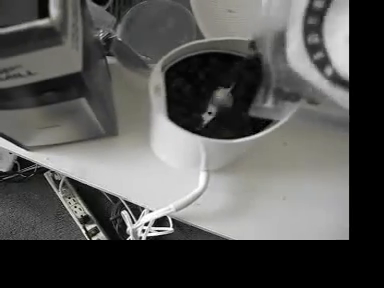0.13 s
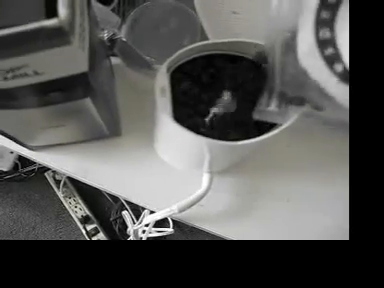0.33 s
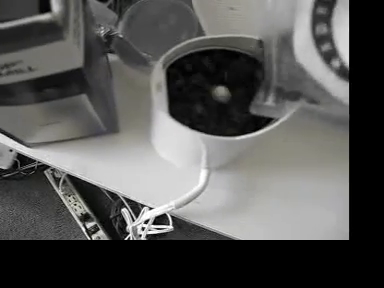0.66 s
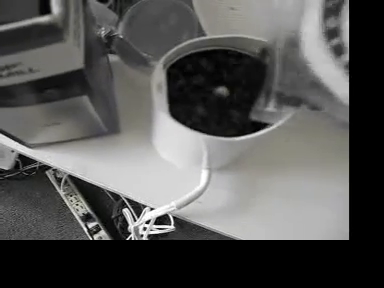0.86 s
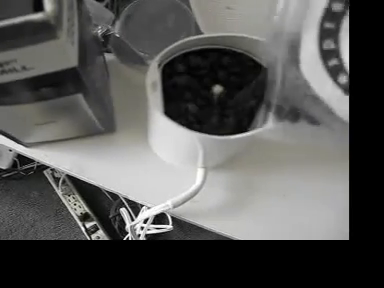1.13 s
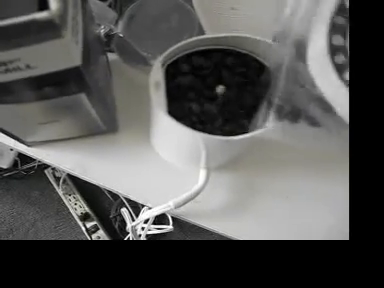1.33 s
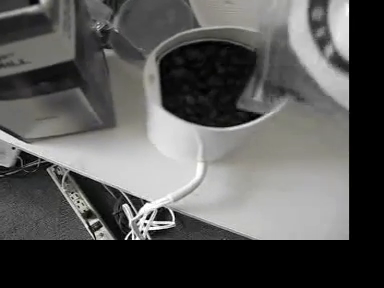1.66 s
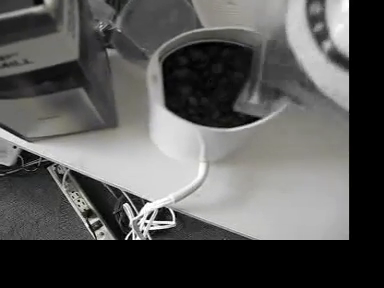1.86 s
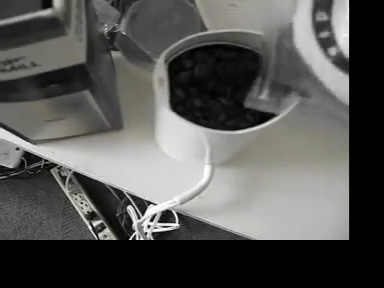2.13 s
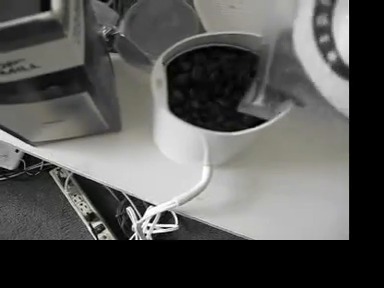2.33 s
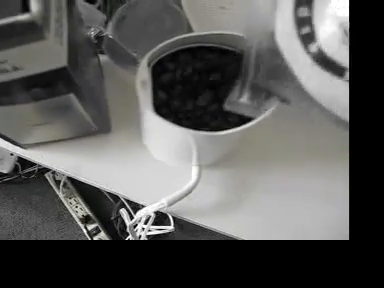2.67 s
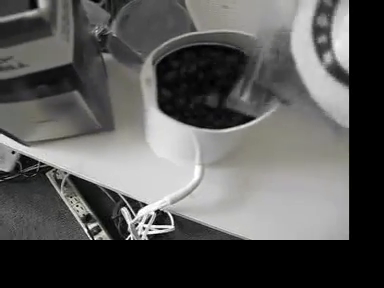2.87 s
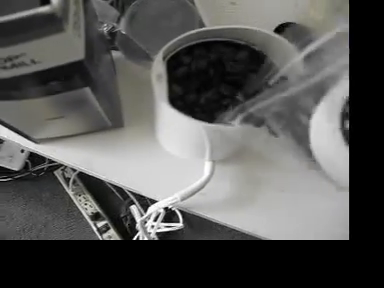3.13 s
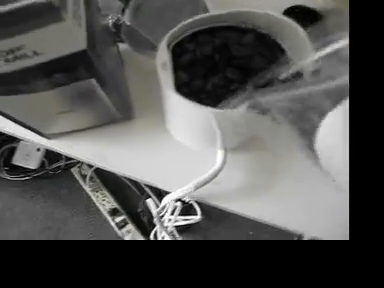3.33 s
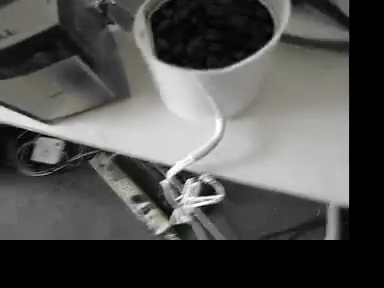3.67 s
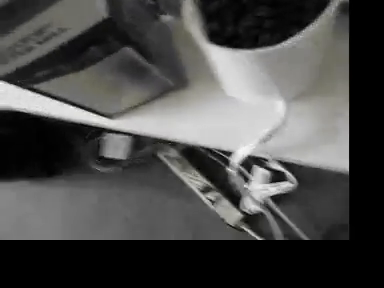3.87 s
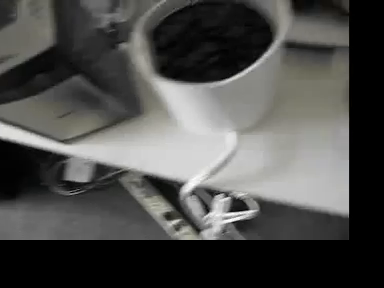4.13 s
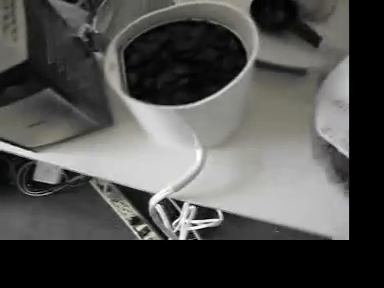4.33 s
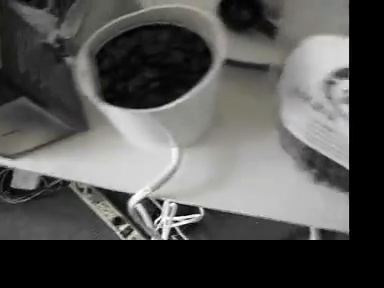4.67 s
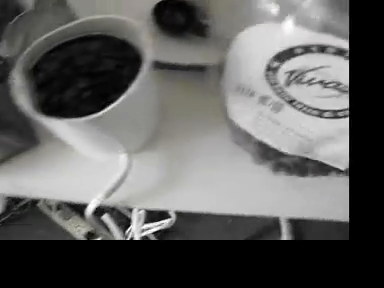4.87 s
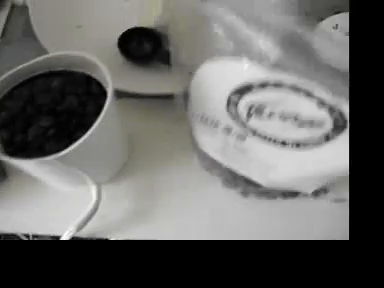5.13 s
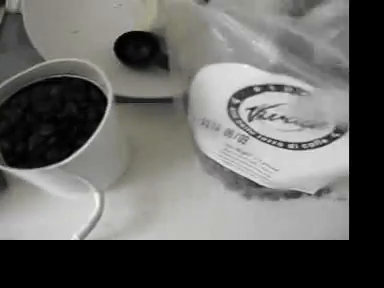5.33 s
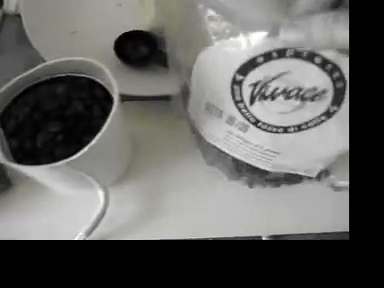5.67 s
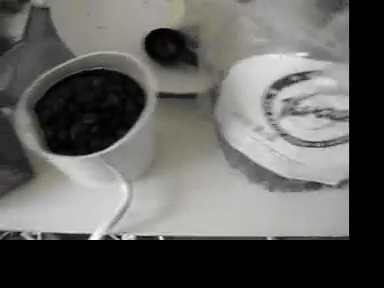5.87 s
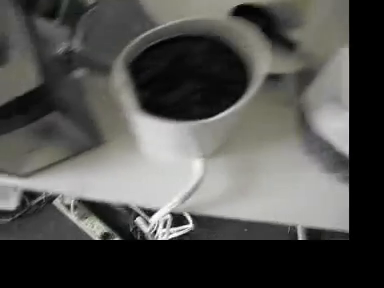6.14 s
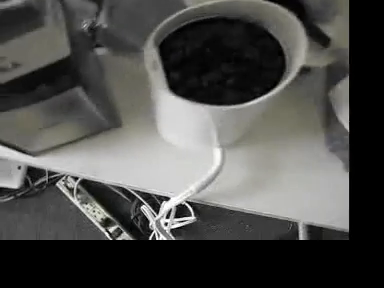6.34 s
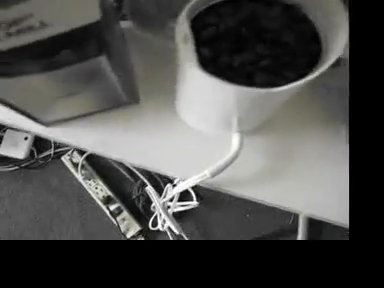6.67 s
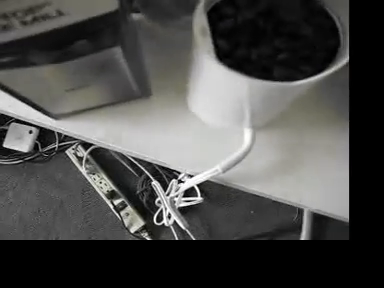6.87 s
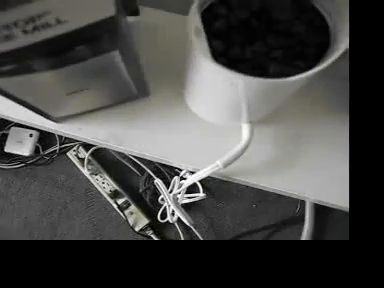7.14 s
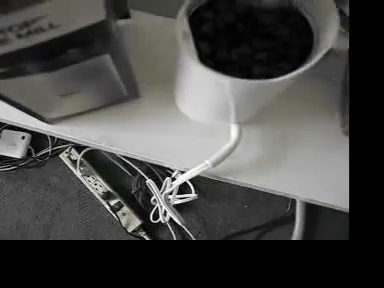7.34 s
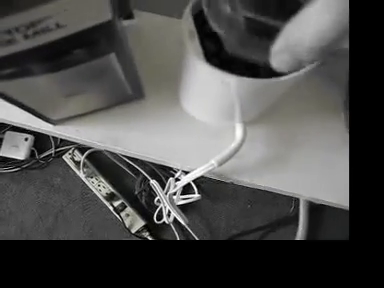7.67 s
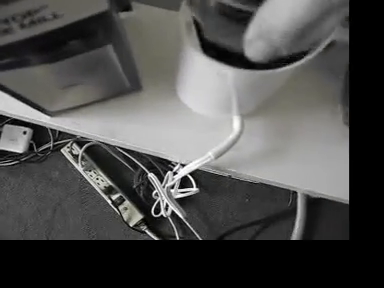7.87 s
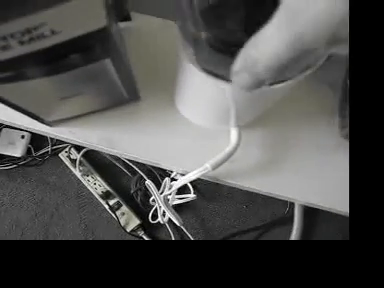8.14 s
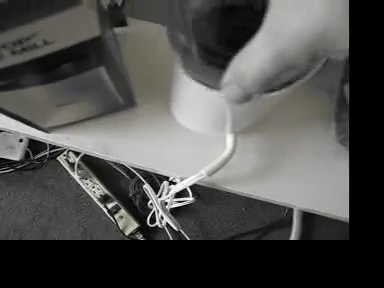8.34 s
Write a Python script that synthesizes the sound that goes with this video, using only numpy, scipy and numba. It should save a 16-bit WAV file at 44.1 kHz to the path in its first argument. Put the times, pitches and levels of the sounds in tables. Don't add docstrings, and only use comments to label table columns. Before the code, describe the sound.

Dense, high bean ticks and light film crackle open the scene, with a slight metallic ring that fades as the cup fills. Around the middle the plastic bag is squeezed hard in sharp, loud bursts, then pops only occasionally. A quiet gap holds steady microphone hiss and tiny squeaks. Last, a lid taps, slides and clunks over the cup. Very close microphone, dry small room, no motor.

```python
import sys
import numpy as np
from scipy import signal
from scipy.fft import rfft, irfft
from scipy.io import wavfile
from scipy.ndimage import uniform_filter1d
from numba import njit

SR = 44100
rng = np.random.default_rng(int(sys.argv[2]) if len(sys.argv) > 2 else 0)


def generate_wav(sig):
    pcm = np.round(np.clip(np.atleast_2d(sig).T, -1, 1) * 32767).astype(np.int16)
    wavfile.write(sys.argv[1], SR, pcm)


def ratio_of_db(decibels):
    return 10 ** (np.asarray(decibels, float) / 20)


N = 374409
TIME = np.arange(N) / SR

# (time [s], hold [s], level [dB], crispness [dB])
SHAKES = [(0.033, 0.12, -37.5, 4.5), (0.26, 0.13, -36.5, 3.5), (0.444, 0.06, -38, 7),
          (0.582, 0.11, -35.5, 3.5), (0.78, 0.077, -39.5, 9.5), (0.893, 0.2, -36, 0.5),
          (1.092, 0.14, -41, 6), (1.299, 0.033, -39, 4.5), (1.432, 0.021, -34.5, -7), (1.62, 0.24, -33, -3),
          (1.764, 0.1, -43, 3.5), (2, 0.023, -39, 9), (2.104, 0.052, -39, 2), (2.305, 0.25, -38, -0.5),
          (2.58, 0.08, -38.5, 3), (2.71, 0.011, -44, 2)]
BEAN_CYCLES = 20


@njit
def rings(start, hz, t60, size, n):
    y = np.zeros(n)
    for k in range(len(start)):
        turn = np.exp(2j * np.pi * hz[k] / SR - np.log(1000) / (t60[k] * SR))
        z = size[k] + 0j
        for i in range(start[k], min(n, start[k] + int(t60[k] * SR))):
            y[i] += z.imag
            z *= turn
    return y


def grains(s, hz, t60, size):
    s, hz, t60, size = (np.ravel(v) * 1. for v in np.broadcast_arrays(s, hz, t60, size))
    start = np.clip(s * SR, 0, N - 1).astype(np.int64)
    return rings(start, np.clip(hz, 40, .42 * SR), np.abs(t60), size, N)


def tick(s, db, hz, cycles):
    slow_decay = grains(s, hz, cycles / hz, ratio_of_db(db + 8))
    fast_decay = grains(s, hz, cycles / 3 / hz, ratio_of_db(db + 8))
    return slow_decay - fast_decay


def bursts(s, db, hz, octaves, cycles, smear_s, count):
    chance = rng.random((len(s), 3, count))
    mode_hz = np.reshape(hz, (-1, 1)) * 2 ** (octaves * (2 * chance[:, 0] - 1))
    late = chance[:, 1] ** 2
    sign = np.sign(chance[:, 2] - .5)
    size = ratio_of_db(db[:, None] - 9 * late) * sign / np.sqrt(count / 3)
    return grains(s[:, None] + smear_s * late, mode_hz, cycles / mode_hz, size)


def gesture(s, hold_s, db, rise_db_s, fall_db_s):
    power = np.zeros(N)
    for start, hold, top_db in zip(s, hold_s, db):
        i = max(int((start - 50 / rise_db_s) * SR), 0)
        j = int((start + hold + 50 / fall_db_s) * SR)
        t = TIME[i:j] - start
        rise_db = rise_db_s * np.minimum(t, 0)
        fall_db = fall_db_s * np.maximum(t - hold, 0)
        power[i:j] += ratio_of_db(top_db + rise_db - fall_db) ** 2
    return np.sqrt(power)


def hiss():
    # (frequency [Hz], level [dB per Hz])
    density = [(15, -37), (25, -9), (172, -5.5), (238, -3.5), (313, -4.5), (496, -4), (809, -5.5),
               (4990, -15), (12600, -22.5), (16500, -43)]
    hz, db = np.transpose(density)
    f = np.arange(N // 2 + 1) * SR / N + 1
    shape = ratio_of_db(np.interp(np.log(f), np.log(hz), db))
    noise = irfft(rfft(rng.standard_normal(N)) * shape, N)
    return noise * ratio_of_db(-49) / np.sqrt(np.mean(noise ** 2))


def crackle(moves, hollow_db, upper_db, rise_db_s, fall_db_s, body_share, spread_db, own_db, per_s, taut=1):
    # (frequency [Hz], spread [octaves], decay [cycles])
    film_bands = [
        (2552, 0.95, 11),
        (680, 0.85, 10.5),
        (6000, 1.436, 27),
        (11500, 0.56, 4.8),
    ]
    # (time [s], frequency [Hz])
    crunch_pitch = [(0, 2830), (.7, 2530), (1.5, 2480), (3.5, 2070), (4.1, 2300), (4.95, 2750),
                    (5.03, 3600), (5.15, 2350), (5.4, 2780), (7, 1940)]
    patch_db = 2
    at, hold, db, crisp_db = np.transpose(moves)
    t0, t1 = max(at[0] - .2, 0), at[-1] + .6
    chance = rng.random((20000, 3 + 4 * len(film_bands)))[:int(per_s * (t1 - t0))].T
    s = t0 + chance[0] * (t1 - t0)
    crease_db = np.minimum(-spread_db * np.log(chance[1] + 1e-9), 4 * spread_db)

    flurry = rng.standard_normal(200)

    def swing(values):
        return np.interp((s - t0) / .03, np.arange(len(values)), values)

    crease_db = crease_db + 1.7 * swing(flurry)
    body = gesture(at, hold, db, body_share * rise_db_s, body_share * fall_db_s)
    crisp = gesture(at, hold, db + crisp_db, rise_db_s, fall_db_s)
    gains = [body, body * ratio_of_db(hollow_db), np.sqrt(body * crisp) * ratio_of_db(upper_db), crisp]
    stretch = [1, 1, 1, taut]
    span, out = slice(int(t0 * SR), int(t1 * SR)), np.zeros(N)
    for k, (hz, octaves, cycles) in enumerate(film_bands):
        a, b, c, d = chance[3 + 4 * k:7 + 4 * k]
        center = hz if k else np.interp(s, *np.transpose(crunch_pitch))
        f = center * stretch[k] * 2 ** (octaves * (a + b - 1))
        patch = patch_db * swing(np.roll(flurry, 37 * k + 37))
        size = ratio_of_db(crease_db + patch + own_db * (2 * c - 1)) * np.sign(d - .5)
        band = grains(s, f, cycles / f, size)
        out += band / np.std(band[span]) * gains[k]
    return out


def rustle():
    # (time [s], hold [s], level [dB], crispness [dB])
    squeezes = [
        (3.63, 0.049, -24.5, -3.5),
        (3.7, 0.058, -29, -4.5),
        (3.955, 0.014, -28.5, -3),
        (4.01, 0.072, -25, -5),
        (4.17, 0.019, -31, 4.5),
        (4.225, 0.052, -31, 1),
        (4.32, 0.059, -31.5, 1),
    ]
    # (time [s], hold [s], level [dB], crispness [dB])
    light_grips = [(2.87, 0.24, -42, -6.5), (3.02, 0.15, -43, -27), (3.25, 0.12, -38.5, -23),
                   (3.4, 0.029, -40.5, -23), (3.52, 0.018, -44.5, -3), (3.895, 0.0072, -34.5, -13),
                   (4.46, 0.0043, -43, -1), (4.483, 0.0074, -27.5, -7), (4.56, 0.051, -44.5, -7),
                   (4.755, 0.0063, -33.5, -26), (4.783, 0.008, -29.5, -21), (4.825, 0.023, -31.5, -15.5),
                   (4.89, 0.012, -33, -28), (5.012, 0.015, -34.5, -21), (5.028, 0.026, -38, -11),
                   (5.33, 0.004, -47, -3), (5.358, 0.021, -25, -16), (5.415, 0.012, -30, -14.5),
                   (5.5, 0.032, -45, -32), (5.61, 0.045, -47.5, -11), (5.66, 0.033, -45, -12),
                   (5.76, 0.0066, -44.5, -18), (6.82, 0.0066, -54, 7), (6.92, 0.018, -45, -7),
                   (6.985, 0.016, -39, 2.5), (7.01, 0.0022, -29.5, 0.5)]
    filling_db = -11.0 + 2 * TIME
    grip_hollow_db = np.where(TIME < 4.6, -1.5, -7.5)
    pouring = crackle(SHAKES, filling_db, -7.5, 154, 187, 0.6, spread_db=4.0, own_db=5.0, per_s=2000)
    crumpling = crackle(KEEP_SQUEEZES := squeezes, -6.0, -1.2, 334, 208, 0.86,
                        spread_db=-0.5, own_db=5.0, per_s=5000, taut=1.03)
    gripping = crackle(light_grips, grip_hollow_db, 0.1, 870, 272, 0.96,
                       spread_db=3.0, own_db=3.5, per_s=4000)
    return pouring + crumpling + gripping


def snaps():
    # (time [s], peak level [dB], frequency [Hz], treble against peak [dB])
    pour_folds = [(0.053, -12, 2820, -1), (0.4453, -8.5, 2298, -23), (0.6288, -12.5, 3290, -10),
                  (0.792, -17, 3030, -2), (1.1499, -17, 2040, 6.5), (1.293, -14.5, 2870, 2),
                  (1.328, -15, 2200, -11), (1.4496, -14, 2650, 3), (1.515, -10.5, 2170, -13.5),
                  (1.9354, -15.5, 2410, 5), (2.175, -15, 1870, -22), (2.8401, -10, 1870, -9),
                  (2.9114, -18, 1380, -28), (3.0038, -14.5, 2040, 6.5), (3.04, -13, 2700, -15),
                  (3.063, -19, 1890, -21), (3.0783, -3.5, 2520, -17), (3.244, -6, 3150, -14.5),
                  (3.2873, -7.5, 2120, -21), (3.2982, -2, 2400, -36), (3.4033, -9, 1850, -14),
                  (3.5162, -18.5, 3630, 0), (3.5709, -13.5, 1470, -22)]
    # (time [s], peak level [dB], frequency [Hz], treble against peak [dB])
    fist_folds = [(3.6258, -6.5, 2600, -15), (3.636, -17, 1700, -25), (3.639, -7.5, 1610, -20),
                  (3.658, -9, 2090, -10), (3.694, -13, 2000, -11), (3.703, -11, 1800, -15),
                  (3.715, -11, 1500, -25), (3.7704, -8.5, 1620, -25), (3.911, -9.5, 2010, -37),
                  (3.938, -2.5, 1800, -39), (3.9609, -2.5, 1900, -10), (3.9827, 1, 3120, -31),
                  (4.1041, 2.5, 2400, -3), (4.181, 0.5, 2830, -13), (4.186, -4.5, 2360, -25),
                  (4.1879, -4, 2940, -19), (4.31, -18, 2300, -26), (4.3267, -17, 2950, -22),
                  (4.4827, 1, 2310, -3.5), (4.748, -7.5, 2630, -9), (4.7814, -11.5, 2360, -36),
                  (4.786, -15, 2700, -25), (4.79, -11, 2200, -25), (4.8819, -4, 3470, -19),
                  (4.9882, -18, 1520, -30), (5.1295, -21.5, 1550, -10), (5.342, -8.5, 3020, -10),
                  (5.3547, -4, 2360, -12), (5.3706, -3.5, 1880, -4.5), (5.3879, -2, 2900, -9),
                  (5.445, -11, 2800, -17), (5.5103, -12.5, 2010, -32), (5.66, -21, 3050, -8),
                  (6.9025, -24.5, 3590, -0.5), (6.982, -28, 3010, 9), (7.0569, -18, 2970, 6)]
    # (time [s], peak level [dB], frequency [Hz])
    releases = [(3.6943, -13, 8400), (3.7222, -11, 12900), (3.762, -15, 13000), (3.7843, -13, 12800),
                (3.8046, -17, 12500), (3.8385, -18, 9300), (3.8606, -26, 13200), (4.0498, -13, 10200),
                (4.2291, -15, 12300), (4.2668, -11, 12000), (4.2988, -13, 13200), (4.3268, -8, 12900),
                (4.3423, -16, 13000), (4.3794, -13, 12300), (4.4047, -19, 12700), (4.4186, -26, 11100)]
    s, db, hz, treble_db = np.transpose(pour_folds + fist_folds)
    each = np.ones(len(s))
    contact = tick(s, db - 9.5, hz, 10.6)
    crack = bursts(s, db + 0.2, np.sqrt(3000 * hz), 0.75, cycles=7.7, smear_s=0.0065, count=30)
    upper = bursts(s, db + treble_db / 2 - 15.5, 4400 * each, 0.38, cycles=40.0, smear_s=0.002, count=16)
    treble = bursts(s, db + treble_db, 9000 * each, 0.89, cycles=19.0, smear_s=0.0065, count=30)
    s, db, hz = np.transpose(releases)
    return contact + crack + upper + treble + tick(s, db - 0.1, hz, BEAN_CYCLES)


def bean_ticks():
    # (time [s], peak level [dB], frequency [Hz])
    bean_hits = [(0.0072, -18, 11900), (0.0194, -21, 10000), (0.0285, -17, 8600), (0.0516, -7, 12600),
                 (0.0632, -14, 6400), (0.072, -12, 8400), (0.0814, -5, 11000), (0.088, -17, 8200),
                 (0.095, -13, 11900), (0.099, -6, 10800), (0.13, -13, 11000), (0.1382, -8, 11600),
                 (0.1508, -10, 11700), (0.158, -15, 12100), (0.1656, -8, 11800), (0.17, -19, 11900),
                 (0.1774, -9, 11400), (0.1837, -10, 10700), (0.19, -11, 10800), (0.1967, -12.5, 9800),
                 (0.2254, -17, 7350), (0.234, -9, 11600), (0.2405, -22, 11100), (0.2457, -16, 8500),
                 (0.255, -18, 13000), (0.2592, -15.5, 5630), (0.268, -8, 12600), (0.277, -15, 11600),
                 (0.2884, -8, 11700), (0.29, -10, 11100), (0.301, -12, 8800), (0.318, -7, 11400),
                 (0.333, -17, 12200), (0.3427, -9, 10100), (0.3636, -17, 10000), (0.3694, -20, 6600),
                 (0.372, -14, 11700), (0.379, -12, 11500), (0.4068, -18, 10100), (0.4263, -8, 11400),
                 (0.4348, -17, 11500), (0.4486, -18, 8200), (0.456, -4, 9200), (0.4636, -20, 11300),
                 (0.4688, -7, 11100), (0.4762, -20, 11200), (0.48, -14, 10200), (0.4825, -7, 11400),
                 (0.4986, -12, 12000), (0.5101, -13, 10200), (0.5309, -12, 11600), (0.533, -16, 10900),
                 (0.5472, -16, 9700), (0.5528, -13, 9600), (0.562, -15, 11600), (0.583, -22, 12300),
                 (0.587, -9, 12300), (0.5965, -21.5, 11900), (0.6044, -20, 11700),
                 (0.6232, -15, 6000), (0.6307, -11, 11300), (0.643, -12, 6940), (0.6546, -15, 9800),
                 (0.6739, -8, 11800), (0.683, -16, 11000), (0.706, -6, 11400), (0.7622, -12, 8100),
                 (0.7925, -8, 11800), (0.8032, -17, 8300), (0.809, -17, 13100), (0.8372, -13.5, 7740),
                 (0.8493, -11.5, 8300), (0.8558, -7, 12900), (0.8834, -20, 11400), (0.9001, -6.5, 10800),
                 (0.9084, -12, 12100), (0.921, -16, 5800), (0.929, -12, 13000), (0.94, -15, 11800),
                 (0.944, -25, 11800), (0.956, -6, 10000), (0.9597, -9, 11600), (0.9787, -17, 11500),
                 (1.0044, -18, 11600), (1.013, -13, 11500), (1.085, -24, 10700), (1.0874, -14, 11500),
                 (1.0962, -30, 11100), (1.116, -7, 11300), (1.121, -6, 11700), (1.1303, -11, 11500),
                 (1.134, -7, 12200), (1.161, -9, 11800), (1.1704, -11, 11900), (1.1935, -16, 7300),
                 (1.211, -11, 12100), (1.2286, -11, 11000), (1.2325, -11, 12200), (1.241, -5, 11900),
                 (1.2688, -13, 11900), (1.293, -11, 11000), (1.299, -9, 11600), (1.3035, -20, 5700),
                 (1.328, -23, 5800), (1.361, -30, 8460), (1.4508, -13, 8000), (1.4625, -11, 11880),
                 (1.469, -15, 11500), (1.5507, -17, 11500), (1.5538, -17.5, 8800), (1.556, -13, 13100),
                 (1.592, -19, 10300), (1.5982, -14.5, 11500), (1.6553, -20, 6000), (1.6659, -14, 10800),
                 (1.679, -13, 10800), (1.683, -12, 11900), (1.6972, -7.5, 11500),
                 (1.7097, -12, 8450), (1.7194, -17, 12200), (1.7521, -16, 10900), (1.7618, -5.5, 10500),
                  (1.7834, -9, 11100), (1.795, -8, 11400), (1.8533, -16, 10000), (1.8746, -14.5, 9300),
                  (1.88, -10, 11900), (1.9336, -17, 8200), (1.9398, -4, 11700), (1.948, -12, 12700),
                  (1.968, -20, 8200), (1.9736, -13, 10500), (2.001, -4, 12700), (2.026, -13, 9400),
                  (2.035, -14, 11500), (2.0395, -11, 10700), (2.0425, -24, 11400), (2.0474, -11, 10800),
                  (2.063, -16, 11600), (2.077, -19, 11800), (2.094, -17, 9900), (2.0994, -21, 7300),
                  (2.1036, -14, 7240), (2.1167, -7.5, 11300), (2.1212, -15, 13100), (2.1252, -14.5, 8250),
                  (2.1601, -24, 10600), (2.1757, -19, 11400), (2.219, -19.5, 8000), (2.2554, -20, 5460),
                  (2.3454, -15, 11700), (2.3545, -17, 11200), (2.3717, -17, 8800), (2.3902, -8.5, 11400),
                  (2.4044, -16, 10900), (2.4098, -13, 11200), (2.421, -16, 11700), (2.4271, -8, 11600),
                  (2.442, -15, 9800), (2.4562, -8, 12000), (2.475, -9, 11700), (2.5251, -14.5, 9500),
                  (2.554, -19, 9600), (2.5627, -5, 10000), (2.5654, -16, 10700), (2.6024, -24, 8400),
                  (2.6081, -14, 11800), (2.6254, -26, 8200), (2.6507, -21, 10100), (2.656, -19, 10600),
                  (2.7132, -12.5, 12400), (2.7613, -34.5, 10800), (2.7665, -17, 12300), (2.7765, -7, 12300),
                  (2.841, -23, 5450), (2.8768, -19.5, 6300), (2.925, -21, 11700)]
    s, db, hz = np.transpose(bean_hits)
    each = np.ones(len(s))
    contact = tick(s, db, hz, BEAN_CYCLES)
    shells = bursts(s, db - 11, 11300 * each, 0.35, cycles=36.0, smear_s=.004, count=10)
    bowl_db = db - 18 - 5 * s
    bowl = bursts(s, bowl_db, 3280 * each, 0.049, cycles=47.0, smear_s=0.0022, count=3)
    low = bursts(s, db - 17.0, 4500 * each, 0.88, cycles=28.0, smear_s=0.0014, count=6)
    return contact + shells + bowl + low


def stray_beans():
    at, hold, shake_db, crisp_db = np.transpose(SHAKES)
    chance = rng.random((600, 3)).T
    s = 2.9 * chance[0]
    hz = 11700 * 2 ** (0.2 * (chance[2] - .5))
    strays = bursts(s, 8 - 10 * chance[1], hz, 0.047, cycles=BEAN_CYCLES, smear_s=.0012, count=5)
    return strays * gesture(at, hold, shake_db + crisp_db, 430, 210)


def bean_thuds():
    # (time [s], peak level [dB], frequency [Hz])
    clumps = [(0.425, -26.5, 670), (1.45, -18, 826), (1.599, -24.5, 770), (1.76, -21, 790),
              (1.933, -23, 756), (2.078, -23.5, 675), (2.255, -23, 694), (2.338, -30.5, 700),
              (2.562, -23.5, 680), (2.84, -21.5, 646), (3.04, -17.5, 920), (3.14, -27.5, 586),
              (3.369, -31, 710), (3.403, -18.5, 644), (5.753, -38, 596), (7.016, -29, 930)]
    s, db, hz = np.transpose(clumps)
    thump = grains(s, hz, 13.3 / hz, ratio_of_db(db + 5.5))
    return thump + bursts(s, db - 3.0, 0.79 * hz, 1.0, cycles=6.7, smear_s=0.00348, count=8)


def squeaks():
    # (time [s], length [s], start frequency [Hz], end frequency [Hz], level [dB], overtone [dB], waver [0-1])
    slips = [
        (4.385, .055, 4660, 4420, -38, -30, .03),
        (4.535, .115, 4370, 4100, -46, -30, .04),
        (6.485, .035, 3400, 3300, -49, -20, .9),
        (6.785, .012, 3150, 3150, -48, -2, .2),
        (6.81, .025, 3150, 3100, -42, -2, .2),
        (6.718, .012, 950, 950, -45, -30, .1),
    ]
    out = np.zeros(N)
    for s, length, hz0, hz1, db, over_db, rough in slips:
        n, i = int(length * SR), int(s * SR)
        waver = uniform_filter1d(rng.standard_normal(8000), 90)[:n]
        hz = np.linspace(hz0, hz1, n) * (1 + rough * waver)
        phase = 2 * np.pi * np.cumsum(hz) / SR
        tone = np.sin(phase) + ratio_of_db(over_db) * np.sin(2.12 * phase)
        out[i:i + n] += ratio_of_db(db) * np.hanning(n) ** .5 * tone
    return out


def modes(s, db, table):
    hz, mode_db, t60 = np.transpose(table)
    chance = rng.standard_normal((len(s), 2, len(hz)))
    mode_hz = hz * (1 + 0.008 * chance[:, 0])
    return grains(s[:, None], mode_hz, t60, ratio_of_db(db[:, None] + mode_db + 2.0 * chance[:, 1]))


def lid():
    # (time [s], peak level [dB], main tone [Hz], shell [dB], treble [dB]); the main tone is the air
    # space, but the shell at 7.5354 s and the cup at 7.774 s
    contacts = [(7.533, -9.5, 1400, -8, -10.5), (7.5354, -16.5, 2480, -28, -27),
                (7.538, -12, 1140, -33, -17), (7.612, -34, 1320, 6.5, 4), (7.774, -26.5, 1730, 0, -2),
                (7.978, -18.5, 1020, -8.5, -14), (7.982, -5.5, 1088, -26, -27.5),
                (8.115, -22.5, 1000, -13, -17), (8.21, -3, 960, -26, -29), (8.2189, -6, 940, -24, -28),
                (8.233, -9, 890, -27, -30), (8.328, -25.5, 810, -32, -29), (8.35, -35, 796, -25, -21),
                (8.361, -25.5, 696, -2, 3), (8.379, -24, 720, -33, -21), (8.4, -37, 710, -2, -5),
                (8.409, -39, 600, 5, -3)]
    # (time [s], hold [s], air space level [dB], cup and shell against it [dB, dB])
    slides = [
        (7.544, 0.042, -31, -2.5, -7),
        (7.748, 0.015, -39, 0, 1),
        (7.764, 0.0043, -42, 4, 8),
        (7.99, 0.033, -35, -5, -16),
        (8.105, 0.011, -43.5, 3, -8),
        (8.24, 0.036, -30.5, -6.5, -21),
        (8.31, 0.048, -39.5, -14, -22),
        (8.364, 0.037, -35.5, -27, -12),
    ]
    # (time [s], frequency [Hz])
    cavity = [
        (7.5, 1160),
        (7.98, 1033),
        (8.21, 910),
        (8.3, 860),
        (8.37, 680),
        (8.49, 584),
    ]
    # (frequency [Hz], level [dB], t60 [s])
    cup_modes = [(1382, 0, 0.12), (1612, 3.5, 0.069), (1640, -18, 0.1)]
    # (frequency [Hz], level [dB], t60 [s])
    shell_modes = [(1950, -10, .015), (2460, -3, .04), (2710, -2, .022), (2990, -3, .035), (3290, -2, .02),
                   (4650, -10, .015)]
    s, db, hz, shell_db, treble_db = np.transpose(contacts)
    s = s + .0012
    knocks = tick(s - .0006, db, hz, 10) + tick(s - .0006, db - 7, 1600, 20)
    knocks = knocks + modes(s, db - 29.0, cup_modes) + modes(s, db + shell_db + 0.5, shell_modes)
    knocks = knocks + bursts(s, db + treble_db + 2.5, np.full(len(s), 8500.), 0.63,
                             cycles=107.0, smear_s=0.0017, count=20)

    when = 7.4 + 1.1 * rng.random(1400)
    chance = rng.standard_normal((2, len(when)))
    air_hz = np.interp(when, *np.transpose(cavity)) * (1 + 0.064 * chance[0])
    air = grains(when, air_hz, 0.038, chance[1])
    cup = modes(when, 2.9 * chance[1], cup_modes)
    shell = modes(when, np.zeros(len(when)), shell_modes)
    shell = shell + bursts(when, np.full(len(when), 2.5), 7850.0, 0.61, 72.0, 0.0062, count=6)
    at, hold, air_db, cup_db, shell_db = np.transpose(slides)
    out = knocks
    for part, part_db in ((air, 0), (cup, cup_db), (shell, shell_db)):
        steady = part / np.std(part[int(7.5 * SR):])
        out = out + steady * gesture(at, hold, air_db + part_db, rise_db_s=1800, fall_db_s=343)
    return out


def counter(film):
    dull = signal.sosfilt(signal.butter(2, 1500, fs=SR, output="sos"), film)
    push = dull * rng.standard_normal(N)
    return ratio_of_db(-3) * signal.sosfilt(signal.butter(2, [90, 300], "band", fs=SR, output="sos"), push)


def room(x):
    t60_s, tail_db = 0.033, -16.5
    t = TIME[:SR // 2]
    tail = rng.standard_normal(len(t)) * ratio_of_db(-60 * t / t60_s) * np.minimum(t / 0.004, 1)
    tail = signal.lfilter(*signal.butter(1, [1300, 5450], "band", fs=SR), tail)
    tail = tail / np.sqrt(np.sum(tail ** 2))
    return x + ratio_of_db(tail_db) * signal.fftconvolve(x, tail)[:N]


def scene():
    film = rustle() + snaps() + bean_ticks() + stray_beans() + bean_thuds()
    radiation = signal.butter(2, [484, 13740], "band", fs=SR, output="sos")
    near = signal.sosfilt(radiation, film + squeaks() + lid())
    return (room(near + counter(film)) + hiss())[None]


def top_cut(x):
    return signal.sosfilt(signal.butter(12, 15900, fs=SR, output="sos"), x)


def record(dry):
    ceiling = .72
    x = signal.sosfilt(signal.butter(6, 15600, fs=SR, output="sos"), dry)
    x = x / (1 + np.abs(x / ceiling) ** 6) ** (1 / 6)
    return top_cut(x)


dry = scene()
out = record(dry)
generate_wav(out)
```